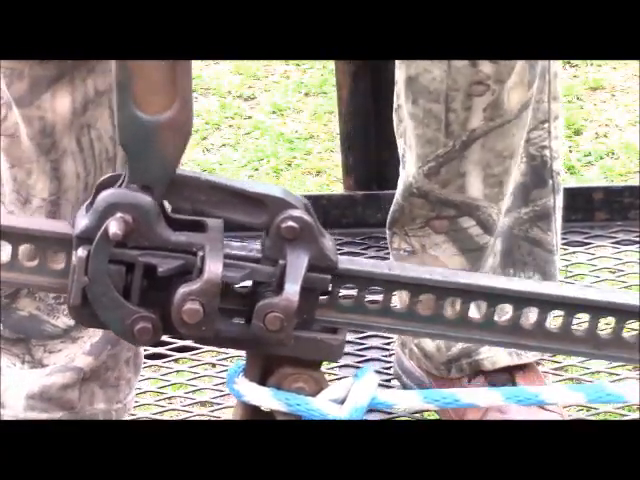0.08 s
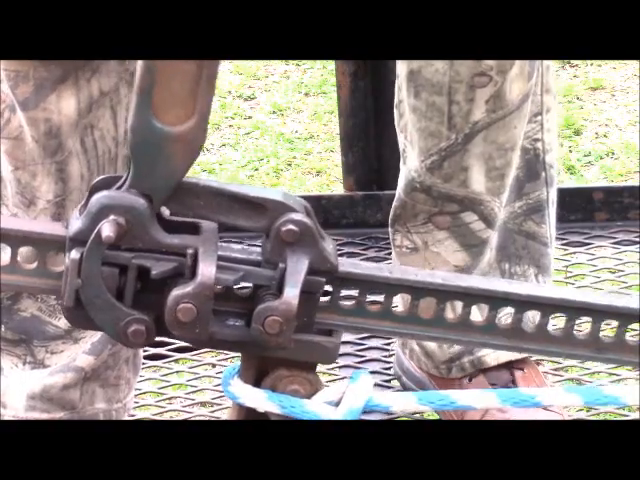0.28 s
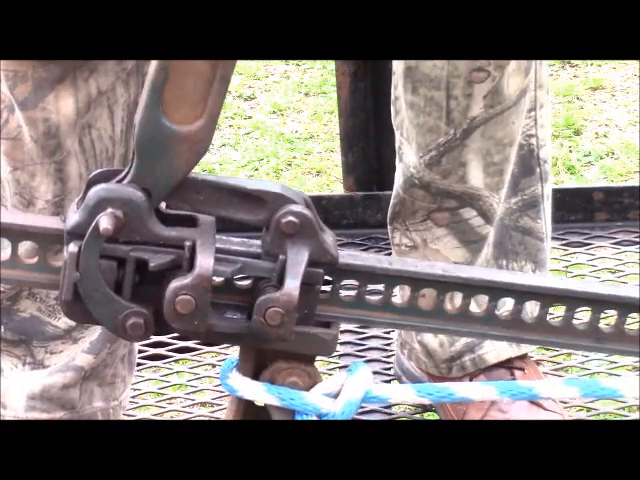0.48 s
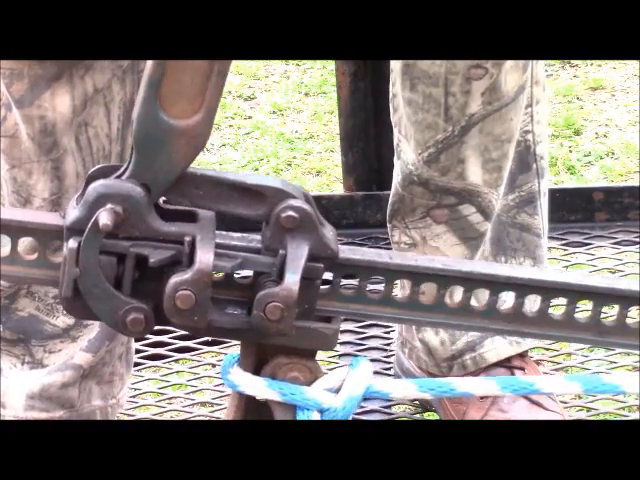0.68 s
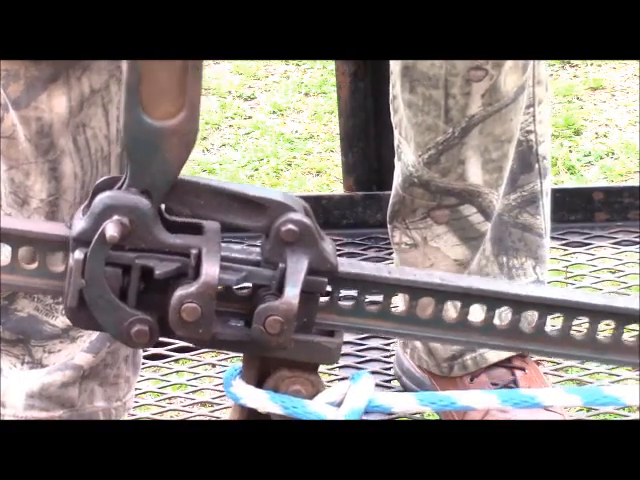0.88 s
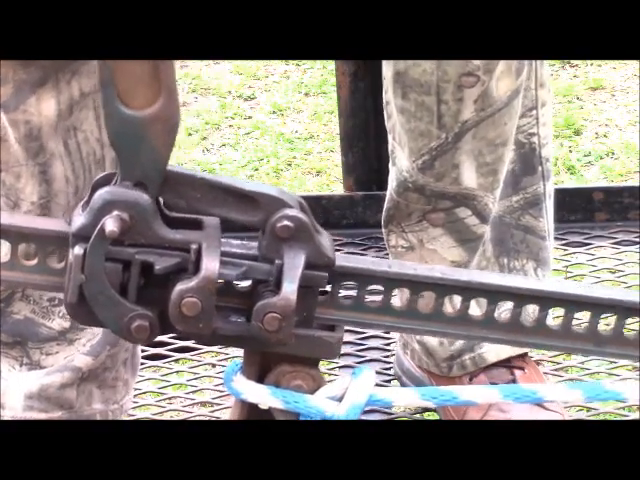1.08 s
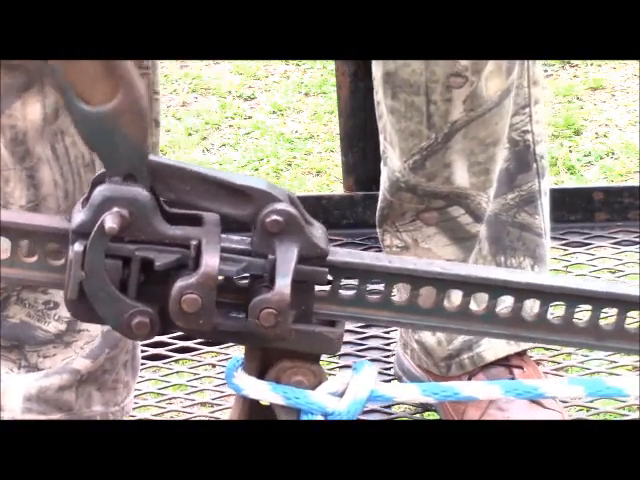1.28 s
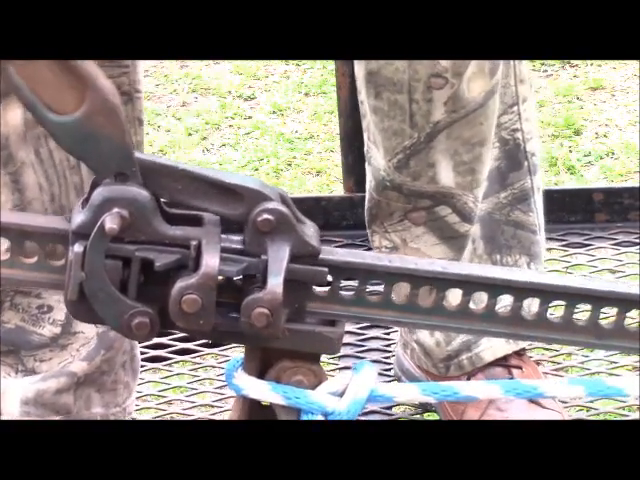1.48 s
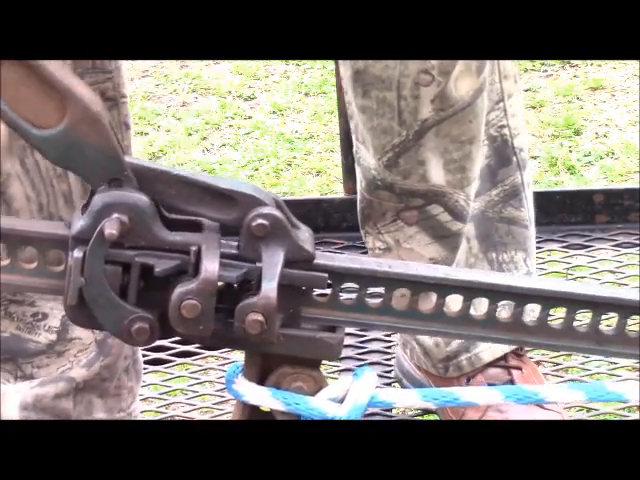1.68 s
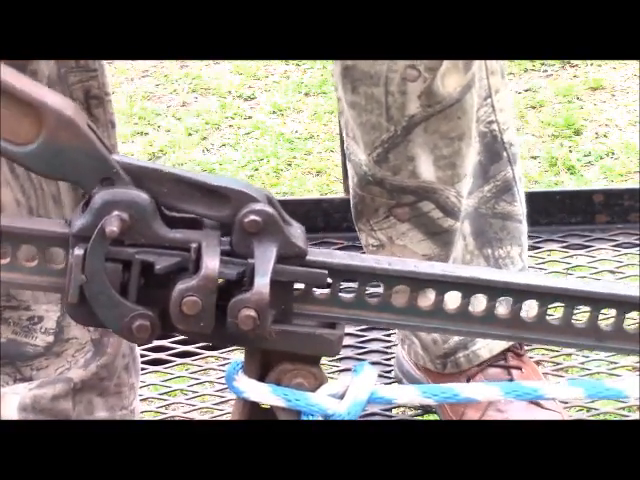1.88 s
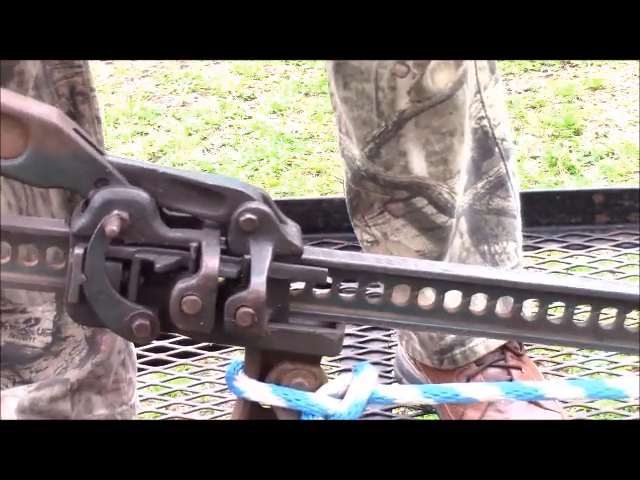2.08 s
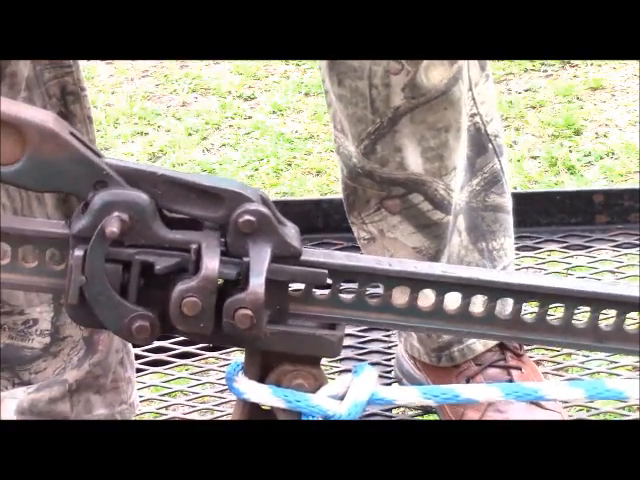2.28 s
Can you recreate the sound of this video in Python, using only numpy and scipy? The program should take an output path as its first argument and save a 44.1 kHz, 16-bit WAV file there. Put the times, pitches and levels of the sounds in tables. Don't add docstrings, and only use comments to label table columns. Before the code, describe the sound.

Two loud metallic snaps of a lever jack, with small knocks, creaks and scraping between them

```python
import sys
import numpy as np
from scipy import signal
from scipy.fft import rfft, irfft
from scipy.io import wavfile
from scipy.ndimage import uniform_filter1d

SR = 44100
rng = np.random.default_rng(int(sys.argv[2]) if len(sys.argv) > 2 else 0)


def int16_out(signal):
    q = np.round(np.clip(np.atleast_2d(signal).T, -1, 1) * 32767)
    wavfile.write(sys.argv[1], SR, q.astype(np.int16))


def attenuation_scalar(level_db):
    decades = np.asarray(level_db, float) / 20
    return 10 ** decades


N = 101430
SIDE_DB = -20.5


def evened(x):
    return x / np.sqrt(np.mean(x ** 2) + 1e-20)


def read(points, hz):
    f, value = np.transpose(points)
    return np.interp(np.log(hz + 1), np.log(f + 1), value)


def add(mix, start_s, sound):
    part = mix[:, round(start_s * SR):][:, :sound.shape[-1]]
    part += sound[:, :part.shape[1]]


def level(curve):
    s, db = np.transpose(curve)
    return attenuation_scalar(np.interp(np.arange(N) / SR, s, db, left=-140, right=-140))


def resonate(x, hz, width_hz):
    turn = np.exp(2j * np.pi * hz * np.arange(x.shape[-1]) / SR)
    r = np.exp(-np.pi * width_hz / SR)
    return 2 * (turn * signal.lfilter([(1 - r) ** 2], [1, -2 * r, r * r], x / turn)).real


def noise(tone, side, patchy_db):
    hz = np.fft.rfftfreq(1024, 1 / SR)
    a, b, c, d, patches = rng.standard_normal((N // 256 + 5, 513, 5)).T
    patches = uniform_filter1d(patches, size=8, axis=0)
    patches = evened(uniform_filter1d(patches, size=12, axis=1))
    side_part = (c + 1j * d) * attenuation_scalar(read(side, hz))[:, None]
    z = np.array([a + 1j * b, side_part]) * attenuation_scalar(read(tone, hz)[:, None] + patchy_db * patches)
    x = signal.istft(z, nperseg=1024, noverlap=768)[1][:, :N]
    return x / np.std(x[0])


# pitch_hz [Hz], level_db [dB per Hz]
AIR_TONE = [(24, -68), (40, -41.5), (134, -3.5), (377, -12), (461, -14), (3130, -29), (13500, -43),
            (16500, -60)]
# pitch_hz [Hz], side_under_mid_db [dB]
AIR_SIDE = [(60, -25.5), (240, -16), (950, -8.5), (3770, -7), (15000, -10)]


def air():
    drone = evened(resonate(rng.standard_normal(N), hz=137.2, width_hz=10))
    drone_db = -68.5
    wash = attenuation_scalar(-60.5) * noise(AIR_TONE, AIR_SIDE, patchy_db=1.0)
    return wash + drone * attenuation_scalar([[drone_db], [drone_db + SIDE_DB]])


def fade(hz, t60, t, cycles):
    decay = np.exp(-np.log(1000) * t / t60[:, None])
    return decay * (1 - np.exp(-t * hz[:, None] / cycles))


def rings(hz, t60, phase, t):
    drift = np.cumsum(rng.standard_normal((len(hz), len(t))), axis=1)
    waver = 0.0035 * (hz[:, None] / 2000) * drift
    swell_cycles = 3.1
    return np.sin(2 * np.pi * (hz[:, None] * t + phase[:, None] + waver)) * fade(hz, t60, t, swell_cycles)


def clear_modes(hz, t60, t):
    a = rng.random((5, len(hz)))
    twins = 0
    for k, side in ((1, -1.013), (3, 1.0)):
        split_hz = 30 * side * (0.3 + a[k]) * (hz / 2000) ** 0.803
        twins = twins + rings(hz + split_hz, t60, a[k + 1], t)
    return rings(hz, t60, a[0], t) + attenuation_scalar(-2) * twins


# start_s [s], clatter_db [dB], clear_db [dB], damping [factor], brightness_db [dB per octave]
FRONT_PIN_BLOWS = [
    (0.2101, -45.5, -61.5, 3.3, -4),
    (0.219, -41, -69.5, 13.6, 0.5),
    (0.223, -26, -32, 0.94, 0.58),
]
REAR_PIN_BLOWS = [
    (1.9809, -40.5, -60, 3.3, 1.5),
    (1.9841, -31, -30.5, 1.044, 0.11),
]
LINK_BLOWS = [
    (1.757, -40.5, -45, 1.23, 1.04),
    (1.883, -59, -95, 0.77, -6),
]
LATCH_BLOWS = [
    (0.8763, -51.5, -61.5, 1.09, 0),
    (0.9123, -44, -57, 1.34, -0.3),
    (1.294, -59.5, -76, 2.3, -2),
    (1.316, -56, -71.5, 1.29, -1),
    (1.459, -61, -74, 1.7, -2.5),
]
LEVER_BLOWS = [
    (1.342, -54.5, -78, 1.16, 1.5),
    (1.5413, -53.5, -51, 0.95, -2.4),
    (1.559, -57.5, -56, 0.89, -0.5),
    (1.587, -62, -60, 0.55, -3),
    (1.598, -68, -64, 0.75, 5.5),
]
# pitch_hz [Hz], level_db [dB], t60_s [s]
FRONT_PIN = ([(88, -50), (150, -18.5), (905, -13.5), (2400, -8), (8500, -15), (9600, -22.5), (13000, -24.5),
              (16000, -45.5)], [ (194.2, -21.5, 1), (270.5, -13.5, 0.64), (433, -16.5, 0.97),
              (902.6, -11.5, 0.28), (1167, -16, 0.54), (2130, -13.5, 0.48), (2255, -7.5, 0.21),
              (2494, -12.5, 0.2), (2890, -1.5, 0.2), (4506, -23, 0.24), (5490, -6, 0.06), (6722, -13, 0.2),
              (7200, -31.5, 0.83), (11500, -24.5, 0.3)])
REAR_PIN = ([(88, -69), (150, -44.5), (854, -7.5), (1060, -16.5), (2060, -6), (6800, -11), (9500, -18),
             (16000, -32)], [ (266, -22.5, 0.72), (762, -10, 0.36), (821, -9.5, 0.26), (892.4, -9.5, 0.33),
             (1368, -17.5, 0.36), (1552, -14, 0.25), (2130, -20.5, 0.46), (3063, -11.5, 0.24),
             (4250, -8.5, 0.074), (5330, -28, 0.65), (6680, -6.5, 0.1)])
LINK = ([(88, -54), (150, -37.5), (414, -6.5), (1060, -16.5), (1660, -7.5), (3920, -26), (6770, -25.5),
         (16000, -70)], [(267.2, -1.5, 0.92), (435, 0.5, 1), (777, -8, 0.97), (1322, 4.5, 0.19),
         (1578, -5.5, 0.31), (1897, 5, 0.082), (3050, -1.5, 0.14), (5170, -7.5, 0.11)])
LATCH = ([(150, -16.5), (260, -7.5), (700, -6), (1500, -6), (3400, -13), (5500, -31), (9000, -34.5),
          (16000, -75)], [ (269, 10.5, 0.89), (367, 3.5, 0.43), (418, 11, 0.33), (2100, -12, 0.13),
          (3060, -14, .15)])
LEVER = ([(250, -14), (1600, -5.5), (2500, -10), (4200, -17.5), (8000, -26.5), (16000, -60)],
          [ (880, -4, .1), (1400, -10.5, 0.33), (1612, -1.5, .12), (4200, -20, 0.084), (8700, -23, 0.091)])
# pitch_hz [Hz], t60_s [s]
CLATTER_RING = [(150, 0.54), (400, 0.72), (1000, 0.35), (2500, 0.18), (5000, 0.16), (9000, 0.18),
                (15000, 0.052)]
STRUCK = [(FRONT_PIN_BLOWS, FRONT_PIN), (REAR_PIN_BLOWS, REAR_PIN), (LINK_BLOWS, LINK),
          (LATCH_BLOWS, LATCH), (LEVER_BLOWS, LEVER)]


def jack():
    out, size = np.zeros((2, N)), 2 ** 14
    t, hz = np.arange(size) / SR, np.fft.rfftfreq(size, 1 / SR)
    octaves = np.log2((hz + 1) / 2000)
    mid_hz = np.geomspace(100, 18000, 11)
    bands = np.array([np.interp(np.log(hz + 1), np.log(mid_hz), row) for row in np.eye(len(mid_hz))])
    t60, cycles = read(CLATTER_RING, mid_hz), 1.2
    splash = attenuation_scalar(-1) * fade(mid_hz, 0.13 * t60, t, cycles)
    body = fade(mid_hz, t60, t, cycles) + splash
    tail = attenuation_scalar(-22.5) * fade(mid_hz, 3.4 * t60, t, cycles)
    end_fade = np.cos(np.pi / 2 * (t / t[-1]) ** 3)
    for blows, (tone, modes) in STRUCK:
        mode_hz, mode_db, mode_t60 = np.transpose(modes)
        mode_t60 = np.minimum(mode_t60, 0.81)
        lumps = uniform_filter1d(rng.standard_normal(len(hz)), size=40)
        lumps = evened(uniform_filter1d(lumps, size=30))
        for start_s, clatter_db, clear_db, damping, tilt_db in blows:
            colour = evened(attenuation_scalar(read(tone, hz) + tilt_db * octaves))
            z = rfft(rng.standard_normal((2, 1, size))) * colour
            clatter = 0
            for lumps_db, decay in ((2.2, body), (3, tail)):
                lumpy = z * evened(attenuation_scalar(lumps_db * lumps))
                clatter = clatter + (irfft(lumpy * bands) * decay).sum(1)
            gain = attenuation_scalar(mode_db + tilt_db * np.log2(mode_hz / 2000))
            signs = rng.choice([-1, 1], (2, len(mode_hz)))
            clear = (gain * signs) @ clear_modes(mode_hz, mode_t60, t)
            blow = attenuation_scalar(clatter_db) * clatter + attenuation_scalar(clear_db) * clear
            add(out, start_s, blow * np.exp(-(damping - 1) * 25 * t) * end_fade)
    return out * attenuation_scalar([[0], [SIDE_DB]])


def bursts(table, rise_cycles, side_db):
    out, t = np.zeros((2, N)), np.arange(2500) / SR
    for start_s, peak_db, hz, length_s in table:
        u = t / length_s
        rise = np.minimum(t * hz / rise_cycles, 1)
        fall = np.exp(-u ** 3) + 0.18 * np.exp(-u / 3.6)
        shape = rise * fall * np.cos(np.pi / 2 * t / t[-1])
        phase = rng.random((2, 1))
        waver = 0.012 * np.sqrt(hz / 4000) * np.cumsum(rng.standard_normal(len(t)))
        tone = np.sin(2 * np.pi * (hz * t + phase + waver))
        add(out, start_s, attenuation_scalar(peak_db) * shape * tone * attenuation_scalar([[0], [side_db]]))
    return out


# start_s [s], peak_db [dB],
# pitch_hz [Hz], length_s [s]
CRACKS = [(0.2243, -28, 2250, 0.0022), (0.224, -25.5, 998.5, 0.0044), (.2235, -8, 7230, 0.00065),
          (.2242, -7, 8400, 0.0011), (.2243, -17.5, 11670, 0.0021), (.2272, -23.5, 6993, .003),
          (0.2315, -23, 7300, 0.0012), (0.8765, -45.5, 6470, 0.00068), (0.915, -33.5, 1837, 0.0049),
          (1.3245, -58, 6040, 0.0018), (1.467, -66, 3630, 0.0049), (1.599, -60.5, 3660, 0.0083),
          (1.6, -64.5, 6440, 0.016), (1.613, -69, 8300, 0.014), (1.9817, -23, 8700, 0.00067),
          (1.9835, -4.5, 7710, 0.00067), (1.9838, -21.5, 3110, 0.0013), (1.9852, -18.5, 8580, 0.0021)]


def cracks():
    return bursts(CRACKS, rise_cycles=0.6, side_db=-17.5)


# start_s [s], peak_db [dB], pitch_hz [Hz], length_s [s]
TICKS = [(.2235, -17.5, 3425, 0.0012), (.226, -40, 2920, 0.041), (.877, -50, 7940, 0.001),
         (.878, -48.5, 2250, .006), (.878, -48, 463, 0.0069), (.879, -58, 4910, 0.005),
         (.909, -70, 8560, 0.006), (.9135, -54, 4920, .003), (.914, -39, 1103, .004),
         (.915, -53, 3470, .006), (.921, -37, 1177, 0.0046), (1.295, -51, 1270, 0.004),
         (1.301, -49, 1000, .004), (1.315, -57, 2690, .002), (1.317, -50.5, 1177, 0.015),
         (1.325, -57.5, 7400, 0.0021), (1.326, -65, 4000, .003), (1.3425, -49, 4000, .002),
         (1.3425, -55.5, 6640, .002), (1.3425, -49, 2800, 0.0024), (1.348, -69, 6600, 0.0088),
         (1.36, -74, 5400, 0.013), (1.538, -54, 1400, .004), (1.5425, -38, 1556, 0.0035),
         (1.545, -59, 4200, .012), (1.545, -58.5, 3500, 0.011), (1.542, -66, 9030, 0.011),
         (1.56, -50.5, 1695, .012), (1.555, -43, 200, .008), (1.582, -53, 880, 0.0088),
         (1.587, -54, 1567, 0.013), (1.615, -47.5, 478, 0.0095), (1.635, -60, 1500, 0.014),
         (1.652, -59, 1380, 0.016), (1.885, -53.5, 1320, 0.011), (1.893, -55.5, 1656, 0.011),
         (1.972, -51, 1510, 0.0059), (1.545, -50, 95, .03), (1.6, -48, 115.2, 0.036), (1.7, -54, 60, .04),
         (1.459, -54.5, 812, 0.0054), (1.9835, -25.5, 4300, .002), (1.99, -35, 5400, .012),
         (2.005, -45, 3610, 0.011), (.2235, -24.5, 4700, .003), (.305, -42, 2090, 0.0051),
         (.328, -45.5, 934, .008), (1.992, -37.5, 2040, 0.0074), (1.996, -37, 901, 0.015),
         (2.064, -52, 3063, 0.0074)]


def chatter():
    return bursts(TICKS, rise_cycles=1.6, side_db=-21)


# start_s [s], length_s [s], pitch_hz [Hz], level_db [dB]
CHIRPS = [
    (.755, 0.045, 3070, -71.5),
    (2.226, 0.042, 3050, -71),
]


def bird():
    out = np.zeros((2, N))
    for start_s, length_s, hz, db in CHIRPS:
        t = np.arange(0, length_s, 1 / SR)
        whistle = np.sin(np.pi * t / length_s) * np.sin(2 * np.pi * hz * t)
        add(out, start_s, attenuation_scalar([[db], [db - 18]]) * whistle)
    return out


# pitch_hz [Hz], width_hz [Hz], level_db [dB]
DECK_MODES = [(66, 49, -11), (123, 12, -2), (208.2, 42, 0.5), (442, 220, -5.5), (827.7, 250, -11)]
# time_s [s], level_db [dB]
LOAD = [(1.25, -83), (1.36, -62.5), (1.52, -64), (1.55, -55.5), (1.58, -55.5), (1.63, -48), (1.655, -50.5),
        (1.69, -62.5), (1.82, -64.5)]


def deck():
    push = rng.standard_normal((2, N))
    groan = sum(attenuation_scalar(db) * evened(resonate(push, hz, width_hz)) for hz, width_hz, db in DECK_MODES)
    return evened(groan) * level(LOAD) * attenuation_scalar([[3], [SIDE_DB]])


# time_s [s], level_db [dB]
SCRAPE = [(1.27, -89), (1.35, -57.5), (1.5, -73), (1.62, -59), (1.7, -70), (1.95, -61), (2.1, -65),
          (2.33, -65.5)]
# pitch_hz [Hz], level_db [dB]
SCRAPE_TONE = [(200, 1), (450, -1), (1000, 4), (1600, -11), (3000, -10), (7000, -21), (15000, -44)]


def scrape():
    slips = rng.exponential(1, N) * (rng.random(N) < 200 / SR)
    slip_s = 0.0046
    grit = signal.lfilter([0.5], [1, -np.exp(-1 / (slip_s * SR))], slips)
    grit = 0.35 + np.tanh(grit)
    rub = noise(SCRAPE_TONE, [(100, SIDE_DB), (9000, SIDE_DB)], patchy_db=4.5)
    return rub * grit * level(SCRAPE)


def scene():
    mid, side = air() + jack() + cracks() + chatter() + bird() + deck() + scrape()
    return np.array([mid + side, mid - side])


def top_cut(x):
    return signal.sosfilt(signal.butter(12, 16660, fs=SR, output="sos"), x)


def record(dry):
    ceiling, low_cut_hz, top_hz = 0.49, 70, 15900
    firm = dry / (1 + abs(dry / ceiling) ** 4) ** (1 / 4)
    firm = signal.sosfilt(signal.butter(1, low_cut_hz, "high", fs=SR, output="sos"), firm)
    firm = signal.oaconvolve(firm, signal.firwin(255, top_hz, fs=SR)[None], "same")
    return top_cut(firm)


dry = scene()
out = record(dry)
int16_out(out)
```